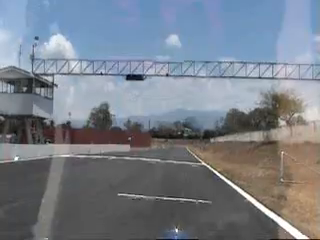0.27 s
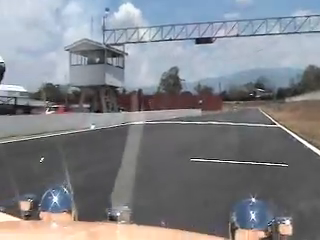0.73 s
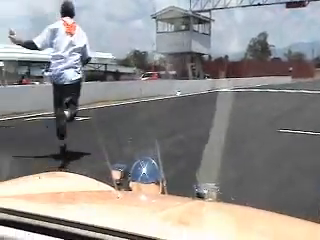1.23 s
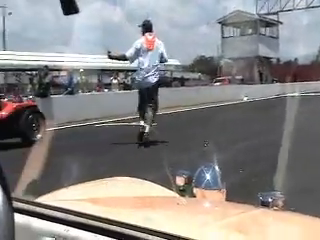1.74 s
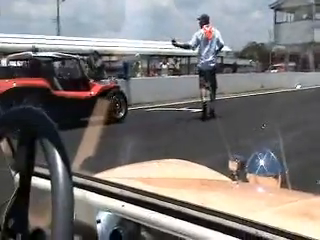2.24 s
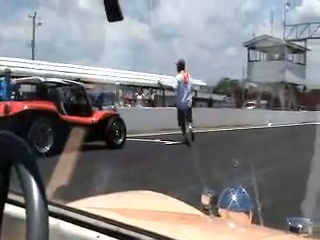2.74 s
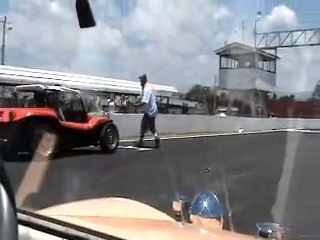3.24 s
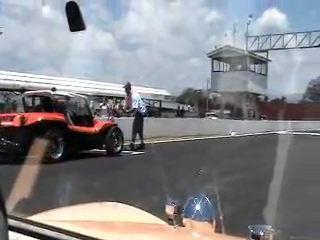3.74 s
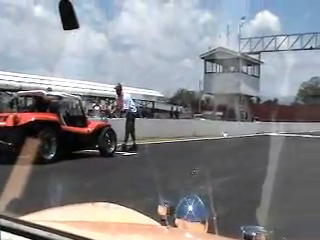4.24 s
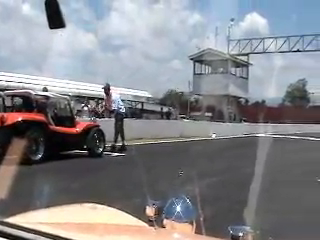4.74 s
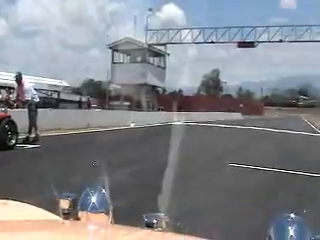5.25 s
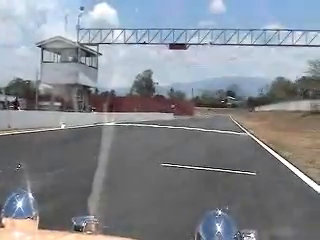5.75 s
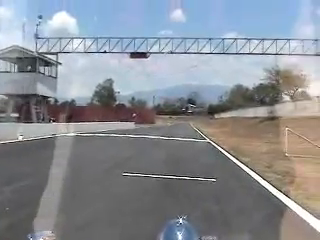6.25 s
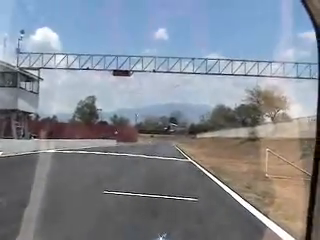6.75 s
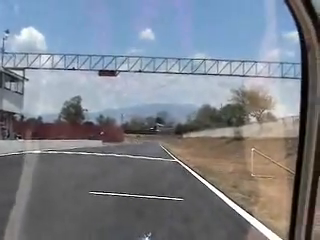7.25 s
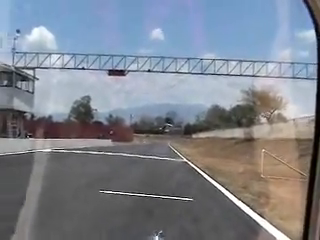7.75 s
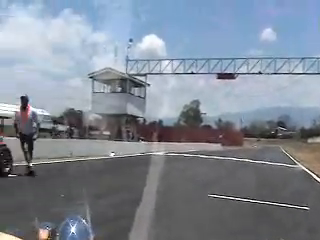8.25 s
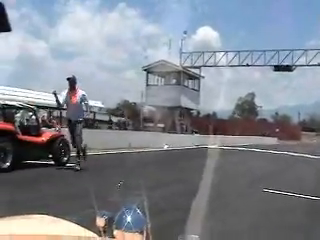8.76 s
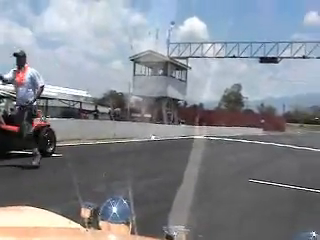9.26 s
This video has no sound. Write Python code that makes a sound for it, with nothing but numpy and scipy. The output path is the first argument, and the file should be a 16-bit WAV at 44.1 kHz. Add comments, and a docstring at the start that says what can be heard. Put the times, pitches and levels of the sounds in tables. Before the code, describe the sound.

It is silent until about 0.8 seconds, when a small buggy engine cuts in abruptly, already idling. It is heard close up, from the open driver's seat at a racetrack. The exhaust gives a low, steady throb through the body, with fast metallic valve clatter, a grainy rattle and a faint fan whine on top. At about 6 seconds a loose metal fitting pings briefly, followed by a fainter, higher ping at 6.3. From around 6.5 seconds the idle sags slightly and grows lumpier. At about 8.3 seconds one quick blip of the throttle makes the engine roar louder and rise in pitch. The carburettor spits back with two small snaps at 8.4 and a sharper, louder crack just before 8.5. The revs then fall away, and the engine runs down toward idle by about 9.4 seconds.

```python
"""In the open driver's seat of a buggy, an air-cooled flat-four cuts in after a silence, idling.
Exhaust pulses throb through the body shell, the valve gear clatters in step with the cam,
the cooling fan whines faintly and loose fittings ping twice. Near the end one blip of the
throttle roars and spits back through the carburettor, and the engine runs down again."""
import sys
import numpy as np
from scipy import signal
from scipy.fft import rfft, irfft, next_fast_len
from scipy.io import wavfile

SR = 44100
rng = np.random.default_rng(int(sys.argv[2]) if len(sys.argv) > 2 else 0)


def unload_wav(signal):
    """Save mono or channel-first audio to the path in sys.argv[1] as 16-bit WAV at rate SR, clipped to [-1, 1]."""
    wavfile.write(
        sys.argv[1],
        SR,
        np.round(np.clip(np.atleast_2d(signal).T, -1, 1) * 32767).astype(np.int16),
    )


N = 418709
TIME = np.arange(N) / SR
IDLE_RPM = 2010  # the speed at which the exhaust is voiced


def amp(db):
    return 10 ** (np.asarray(db) / 20)


def unit(x):
    return x / np.sqrt(np.mean(x ** 2) + 1e-20)


def ramp(x):
    return np.clip(x, 0, 1)


def along(points, hz):
    """Read a curve of (frequency, value) points on a log axis."""
    freqs, values = np.transpose(points)
    return np.interp(np.log(hz + 1), np.log(freqs + 1), values)


def wobble(rate, times):
    """Smooth random modulation, rate knots a second."""
    fine = signal.resample_poly(rng.standard_normal(int(rate * N / SR) + 2), 8, 1)
    return np.interp(times * rate * 8, np.arange(len(fine)), fine)


def filtered(x, response):
    """EQ x with a complex response of frequency."""
    size = next_fast_len(N + SR // 8, True)
    return irfft(rfft(x, size) * response(np.fft.rfftfreq(size, 1 / SR)), size)[..., :N]


def ring(hz, t60):
    """Struck metal: a sine with a fast attack and an exponential tail."""
    t = TIME[:SR // 10]
    return np.sin(2 * np.pi * hz * t) * amp(-60 * t / t60) * (1 - np.exp(-t / 0.00058))


# Stereo image of the noise layers: (frequency [Hz], left-right likeness [1 and above is mono])
LIKENESS = [(100, 2.5), (500, 0.4), (1000, 0.6), (2000, 1.1), (3000, 0.6), (4500, 1), (8000, 3.5)]
def rush(spectrum):
    """Coloured stereo noise of rms 1."""
    def colour(hz):
        alike = np.clip(along(LIKENESS, hz), -1, 1)
        return amp(along(spectrum, hz)) * np.sqrt([1 + alike, 1 - alike])
    mid, side = filtered(rng.standard_normal((2, N)), colour)
    return unit(np.array([mid + side, mid - side]))


# Partials of the idle throb: (order [multiple of crank rate], level [dB])
ORDERS = [(1.0, -44), (1.5, -37), (2.0, -16.5), (2.5, -46), (3.0, -31), (3.5, -36), (4.0, -27.5),
          (4.5, -47.5), (5.0, -23.5), (5.5, -44.5), (6.0, -23.5), (6.5, -34.5), (7.0, -20), (7.5, -45.5),
          (8.0, -35), (8.5, -46.5), (9.0, -26.5), (9.5, -33.5), (10.0, -28), (10.5, -31.5), (11.0, -22),
          (11.5, -49), (12.0, -30.5), (12.5, -37), (13.0, -29), (13.5, -35.5), (14.0, -43.5), (14.5, -46.5),
          (15.0, -35.5), (15.5, -45.5), (16.0, -42.5), (16.5, -42.5), (17.0, -39.5), (17.5, -46.5),
          (18.0, -36), (18.5, -28.5), (19.0, -31), (19.5, -47), (20.0, -35), (20.5, -36), (21.0, -33.5),
          (21.5, -33.5), (22.0, -42.5), (22.5, -40.5), (23.0, -40), (23.5, -45), (24.0, -42.5),
          (24.5, -46.5), (25.0, -44), (25.5, -44.5), (26.0, -47), (26.5, -40), (27.0, -45), (27.5, -43.5),
          (28.0, -41.5)]
# Pipe and body resonances that the partials sweep through: (frequency [Hz], gain [dB])
SHELL_EQ = [(30, -24), (64, -1.5), (85, 0), (118, -8), (160, -3), (200, -5), (237, 1.5), (270, -16),
            (320, -6.5), (372, -8), (405, -11.5), (520, -19.5), (640, -7.5), (1000, -28.5)]
def exhaust(rpm, turns, lope_db, sputter_db, bark_db, wander_db=1.19, lope_hz=130, step=16):
    """The firing pattern repeats every two turns; uneven combustion shakes the upper orders most."""
    crank_hz, turns, t = rpm[::step] / 60, turns[::step], TIME[::step]
    lope_db, sputter_db, bark_db = lope_db[::step], sputter_db[::step], bark_db[::step]
    orders, levels = np.transpose(ORDERS)
    burn_db = sputter_db * wobble(35, t)  # the charges burn unevenly
    throb_db = np.cos(np.pi * (turns - .4))  # the strong cylinders bark most
    edge_db = bark_db + burn_db + throb_db
    note = np.zeros(len(t))
    for k, db, phase in zip(orders, levels, firing_phase(orders)):
        height, idle_hz = k / orders[-1], k * IDLE_RPM / 60
        upper = 1 / (1 + (500 / idle_hz) ** 6)  # the bark sits above the body's boom
        shell_db = along(SHELL_EQ, k * crank_hz) - along(SHELL_EQ, idle_hz)
        lope_band = np.exp(-(2 * np.log(idle_hz / lope_hz)) ** 2)
        half_db = lope_db * (k % 1 > 0) * lope_band  # unequal cylinders feed the low half orders
        drift_db = wander_db * (0.22 + 2 * height) * wobble(1.213, t)
        jitter = 0.1 * (0.9 + 4 * height) * (1 + sputter_db) * wobble(14, t)
        gain = amp(db + shell_db + half_db + drift_db + upper * edge_db)
        note += gain * np.cos(2 * np.pi * k * turns + phase + jitter)
    return np.sqrt(2) * signal.resample_poly(note, step, 1)[:N]


# The four exhaust punches of a cycle, heard at the seat: (crank angle [deg], level [dB])
BLOWS = [(4.1, 1.7), (154.6, 2), (357.6, -3), (434.3, -4.5)]
def firing_phase(orders, echo=.52, echo_s=.01005, muffler_hz=578, damping=.52):
    """Four blows, their echo in the pipe and the muffler's resonance set each order's phase."""
    degrees, db = np.transpose(BLOWS)
    hz = orders * IDLE_RPM / 60
    blows = amp(db) @ np.exp(-1j * np.radians(np.outer(degrees, orders)))
    pipe = 1 + echo * np.exp(-2j * np.pi * hz * echo_s)
    muffler = 1 / (1 - (hz / muffler_hz) ** 2 + 1j * damping * hz / muffler_hz)
    return np.angle(blows * pipe * muffler ** 2)


# Dark breath of the tailpipe: (frequency [Hz], level [dB])
GAS_EQ = [(25, -25.5), (60, 0.5), (110, -5.5), (220, 2), (400, -4.5), (510, -9), (650, -8.5), (800, -11),
          (1100, -20.5), (2000, -57.5)]
def gas(turns, overrun, level_db=-27.5, starved_db=-2.5):
    """Turbulent gas puffs once a turn, most after the two strong blows, less on the overrun."""
    puffs = 1 + 0.18 * np.cos(2 * np.pi * (turns - .1)) + 0.25 * np.cos(np.pi * (turns - .45))
    return amp(level_db + starved_db * overrun) * unit(rush(GAS_EQ) * puffs)


# Throaty body of the intake: (frequency [Hz], level [dB])
ROAR_EQ = [(40, -21), (100, -0.5), (230, -3), (500, -1), (750, -7), (1300, -7), (1800, -14.5), (2600, -19),
           (4000, -26.5), (7500, -38.5)]
def intake(turns, throttle, revs, open_db=-16.5, shut_db=-27.5):
    """The open throttle gulps air twice a turn; suction past the shut plate fades with the revs."""
    flow = amp(open_db) * throttle + amp(shut_db) * revs * (1 - throttle)
    gulps = 1 + 0.55 * np.cos(4 * np.pi * turns)
    return flow * unit(rush(ROAR_EQ) * gulps)


# Spit cues: (time [s], level [dB], decay t60 [s])
SPITS = [(8.37, -21.5, 0.058), (8.383, -20.5, 0.047), (8.4691, -10, .08)]
# Bright crack of a spit: (frequency [Hz], level [dB])
SPIT_EQ = [(200, -7), (700, -6), (1900, 7), (3000, -3), (4200, -12.5), (5800, -9.5), (7500, -19.5),
           (8500, -30.5)]
def carburettor():
    """The engine spits back through the carburettor in sharp bursts that die away."""
    bursts, t = np.zeros(N), TIME[:SR // 5]
    for start_s, db, t60 in SPITS:
        bursts[round(start_s * SR):][:len(t)] += amp(db - 60 * t / t60)
    return bursts * rush(SPIT_EQ)


# Tick pattern, looping every two turns: (crank angle [deg], pitch [Hz], decay t60 [s], level [dB])
KNOCKS = [(115.9, 1225, 0.034, -24), (665, 1210, .05, -28.5), (505, 1225, .03, -30.5),
          (500, 1722, .05, -30), (663, 1720, .025, -28.5), (70, 2490, .03, -30), (265, 2233, .1, -38),
          (589.6, 3030, .12, -36.5), (59.93, 3050, 0.074, -37), (240, 3020, 0.082, -37)]
def tappets(turns, scatter_db=1.0, slack_s=0.00014, pan_db=1.5):
    """Tappets knock at set cam angles, each hit a little loose in timing, level and pan."""
    knocks = np.zeros((2, N + SR))
    cycles, samples = np.arange(int(turns[-1] / 2)), np.arange(N, dtype=float)
    for degrees, hz, t60, db in KNOCKS:
        late, force, pan = rng.standard_normal((len(cycles), 3)).T
        starts = np.interp(2 * cycles + degrees / 360, turns, samples) + late * slack_s * SR
        gains = amp(db + scatter_db * force + pan_db * pan * np.array([[1], [-1]]))
        tick = ring(hz, t60)
        for start, gain in zip(np.clip(starts, 0, N).astype(int), gains.T):
            knocks[:, start:start + len(tick)] += gain[:, None] * tick
    return knocks[:, :N]


# Metallic bed under the ticks: (frequency [Hz], level [dB])
METAL_EQ = [(300, -18), (800, 1.5), (1050, 1), (1250, 2.5), (1450, -0.5), (2000, -3.5), (2600, -1),
            (3100, -5.5), (3500, -8), (4200, -13.5), (5500, -18), (7500, -23.5), (8100, -39.5)]
def gear_rattle(turns, revs, idle_db=-32, rev_db=3):
    """Gears and rockers make a grainy rush that pulses with crank and cam and grows with the revs."""
    swell_db = 0.65 * np.cos(np.pi * (turns + 0.11)) + 0.5 * np.cos(8 * np.pi * turns)
    grain_db = 1.1 * wobble(350, TIME)
    return amp(idle_db + rev_db * revs) * unit(rush(METAL_EQ) * amp(swell_db + grain_db))


# Resonances of the fan housing: (frequency [Hz], gain [dB])
HOUSING_EQ = [(950, -20), (1130, -10), (1270, 2), (1380, -11.5), (2000, -18), (2450, -9.5), (2900, -11)]
def fan(rpm, turns, level_db=-27.0, blades_per_turn=30.3, flutter_rad=.4):
    """The belt-driven fan whines as its blade tone and octave slide through the housing's peaks."""
    blade_hz = blades_per_turn * rpm / 60
    phase = 2 * np.pi * blades_per_turn * turns + flutter_rad * wobble(45, TIME)
    return sum(amp(level_db + along(HOUSING_EQ, k * blade_hz)) * np.sin(k * phase) for k in (1, 2))


# Stray metal accents: (time [s], pitch [Hz], decay t60 [s], level [dB])
PINGS = [(5.971, 1346, .07, -18.5), (6.262, 2630, 0.045, -31)]
def fittings():
    """Loose parts ring briefly."""
    pings = np.zeros(N)
    for start_s, hz, t60, db in PINGS:
        ping = amp(db) * ring(hz, t60)
        pings[round(start_s * SR):][:len(ping)] += ping
    return pings


def blip(pickup_s=8.3351, release_s=8.5015, brake_share=.3592, brake_s=.1621, coast_s=.9643):
    """Throttle, revs and overrun envelopes, 0-1: the engine climbs evenly, then brakes and coasts."""
    lead_s, opening_s, shutting_s = .02, .055, .037  # the plate moves ahead of the engine
    starve_s, recover_s = .12, 1.6  # overrun: the shut throttle starves the spinning engine
    since = np.maximum(TIME - release_s, 0)
    throttle = ramp((TIME - pickup_s + lead_s) / opening_s) * ramp(1 - since / shutting_s)
    braking = brake_share * np.exp(-since / brake_s)
    friction = (1 - brake_share) * ramp(1 - since / coast_s)
    revs = ramp((TIME - pickup_s) / (release_s - pickup_s)) * (braking + friction)
    overrun = ramp(since / starve_s) * ramp(1 - (since / recover_s) ** 2)
    return throttle, revs, overrun


# The slowly sagging idle: (time [s], speed [rpm])
IDLE_SPEED = [(0.8, 2036.4), (2.2, 2027.0), (3.2, 2025.6), (3.9, 2008.2), (4.8, 2024.5), (5.3, 1999.1),
              (6.5, 1995.9), (7.2, 1967.3), (7.8, 1929.2), (8.33, 1933.3)]
def scene(blip_rpm=795.25, first_degrees=580.7):
    """Mix the engine, driven by the idle speed and one blip of the throttle."""
    idle_rpm = np.interp(TIME, *np.transpose(IDLE_SPEED))
    throttle, revs, overrun = blip()
    rpm, sag_rpm = idle_rpm + blip_rpm * revs, IDLE_RPM - idle_rpm
    turns = np.cumsum(rpm) / 60 / SR + first_degrees / 360
    load_db = -0.32 + 4 * throttle - 0.3 * overrun
    lope_db = -2.5 + 0.15 * sag_rpm - 7 * overrun  # lumpier as the idle sags
    sputter_db = 0.44 + revs + .9 * overrun  # scatter from firing to firing
    bark_db = -0.22 - 0.0189 * sag_rpm - 2 * throttle + 4.5 * overrun  # lift of the upper orders
    pipe = amp(load_db) * (exhaust(rpm, turns, lope_db, sputter_db, bark_db) + gas(turns, overrun))
    machinery = tappets(turns) + gear_rattle(turns, revs) + fan(rpm, turns)
    return pipe + machinery + intake(turns, throttle, revs) + carburettor() + fittings()


# Pan across the spectrum: (frequency [Hz], left minus right [dB])
BALANCE = [(60, 0.0), (88, 0.0), (130, 0.0), (190, -0.5), (270, -1.5), (400, -1.5), (580, -0.5),
           (850, -1.5), (1240, 1.0), (1810, 0.5), (2640, 0.0), (3860, 1.0), (5630, -0.23), (8220, 0.0)]
# Phase spread: (frequency [Hz], left lead [rad])
PHASE_LEAD = [(70, .03), (180, 0.086), (350, 0.24), (700, 0.3), (1400, 0.32), (2240, 0.53), (2500, .1),
              (3100, .5), (4000, .25), (5000, .12)]
def record(dry, ceiling=1.1, hardness=2.9, start_s=.8005, top_hz=8050):
    """A close stereo pair with soft clipping on peaks, a hard cut in and a steep low-pass."""
    def spread(hz):
        sides = np.array([[.5], [-.5]])
        return amp(sides * along(BALANCE, hz)) * np.exp(1j * sides * along(PHASE_LEAD, hz))
    pair = filtered(dry, spread)
    squashed = pair / (1 + np.abs(pair / ceiling) ** hardness) ** (1 / hardness)
    gate = ramp((TIME - start_s) / .002 + .5)
    return filtered(squashed * gate, lambda hz: 1 / np.sqrt(1 + (hz / top_hz) ** 120))


dry = scene()
out = record(dry)
unload_wav(out)
```